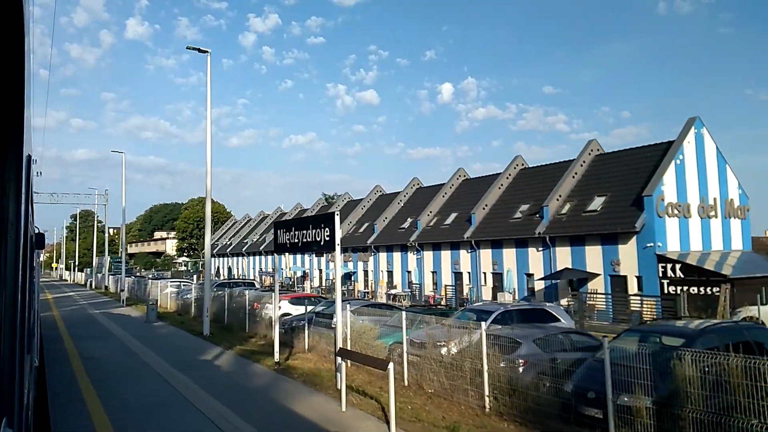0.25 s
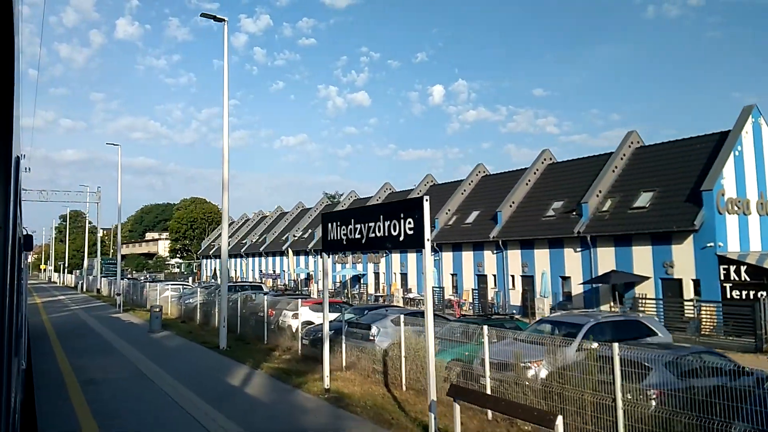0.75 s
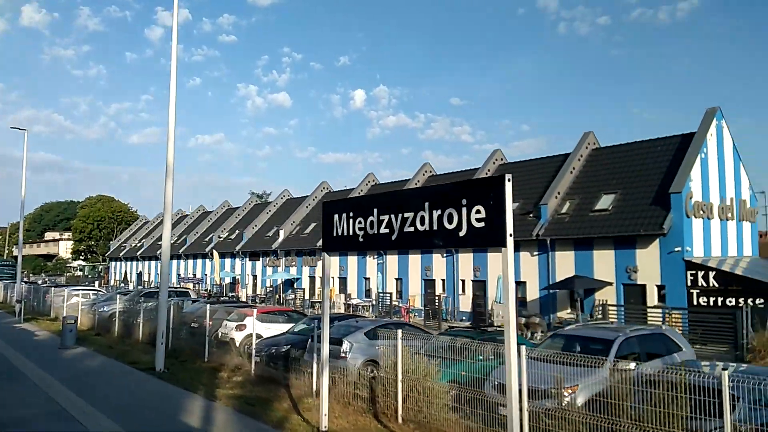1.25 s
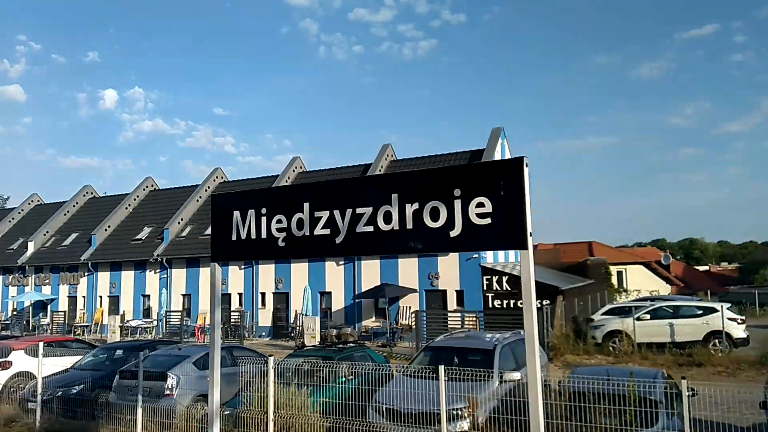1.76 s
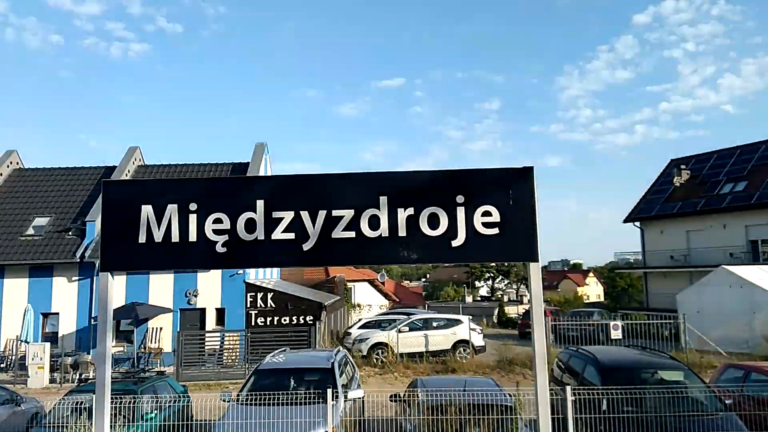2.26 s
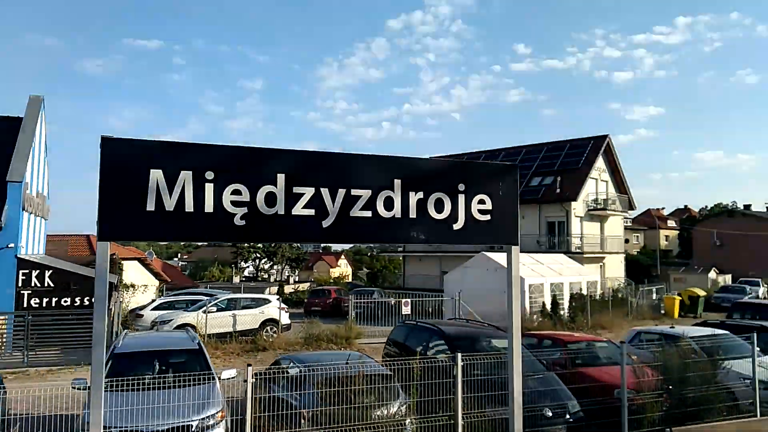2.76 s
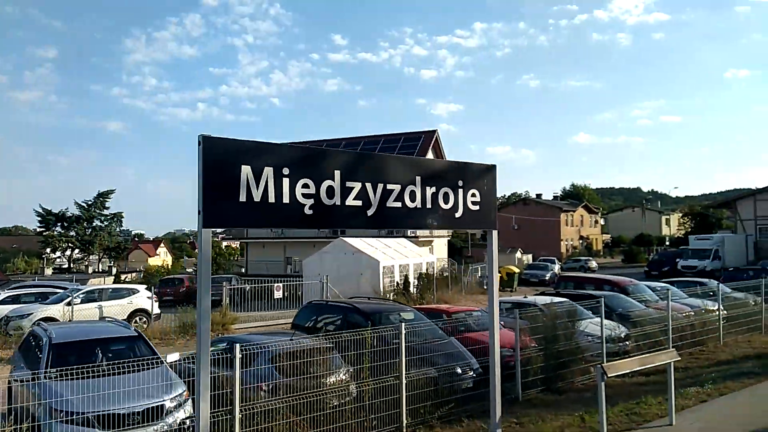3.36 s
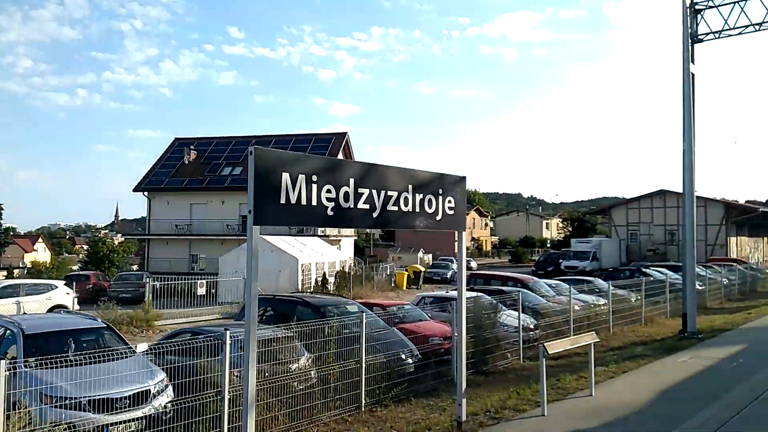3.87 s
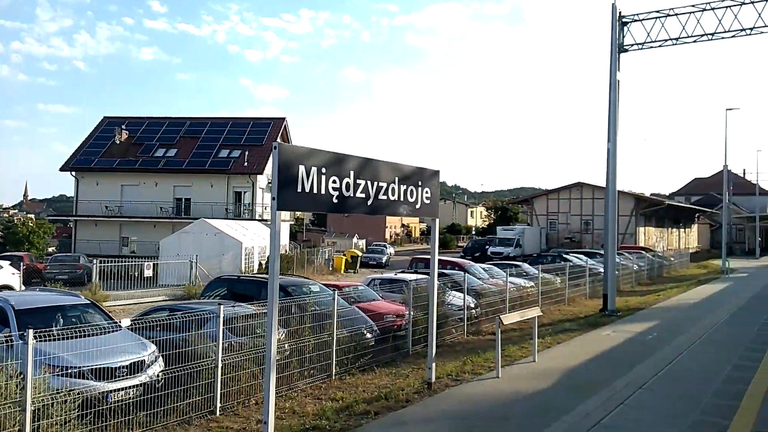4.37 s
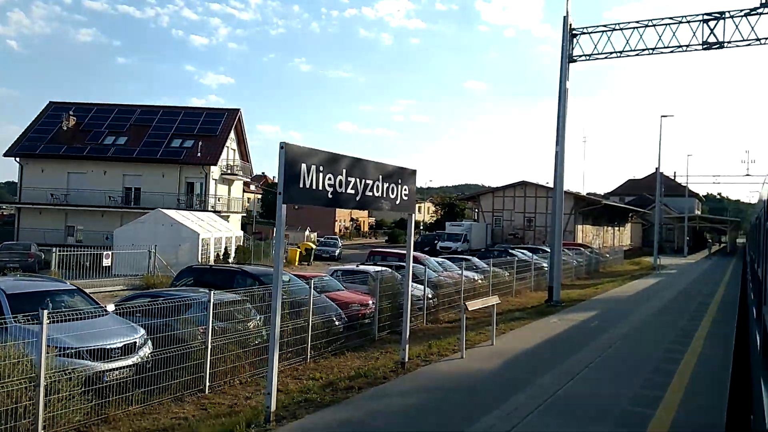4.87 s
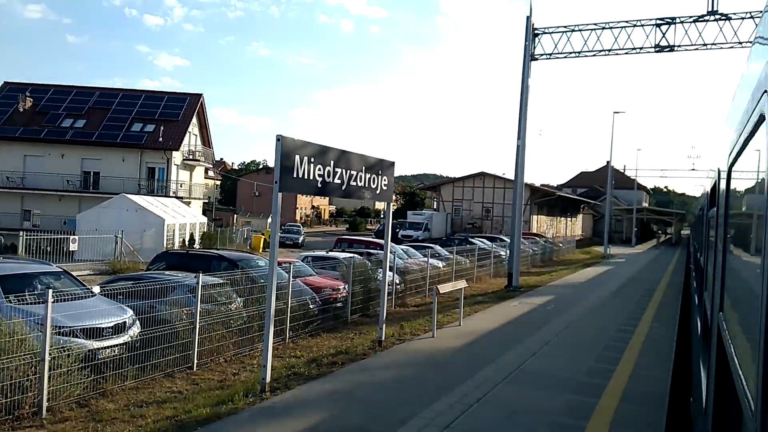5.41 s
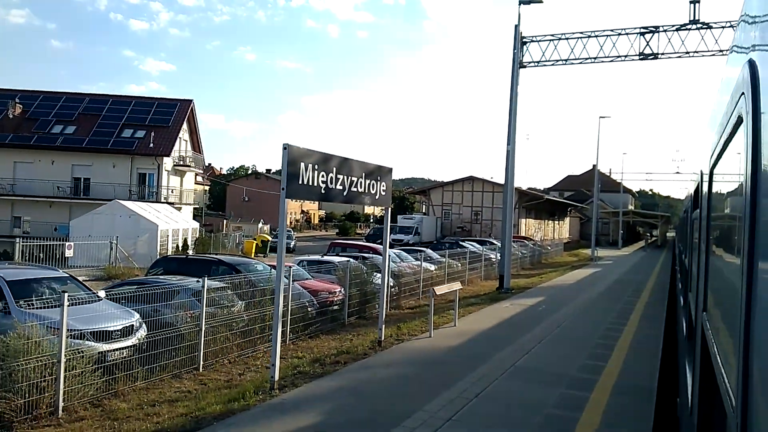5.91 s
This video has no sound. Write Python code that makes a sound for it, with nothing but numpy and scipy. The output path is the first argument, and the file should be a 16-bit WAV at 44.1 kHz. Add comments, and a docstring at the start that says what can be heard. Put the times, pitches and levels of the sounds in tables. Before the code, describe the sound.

Heard from an open window, a slowing train rumbles as its ragged brake squeal builds into a loud, piercing whistle.

```python
"""Train brakes squeal into a station, heard from an open carriage window.
Stick and slip sing one brake mode near 4.5 kHz: scattered and ragged at speed, then a loud, steadier
whistle with overtones and a buzz an octave below. The brakes also hiss, scrape, tick and rasp.
Underneath, air buffets the window, the bogies hum and knock, and rumble and rolling roar fade as the
train slows. A fast limiter holds the squeal down."""
import sys
import numpy as np
from scipy import signal
from scipy.fft import rfft, irfft
from scipy.io import wavfile
from scipy.ndimage import uniform_filter1d, minimum_filter1d

SR = 44100
rng = np.random.default_rng(int(sys.argv[2]) if len(sys.argv) > 2 else 0)


def inscribe(sig):
    """Save sig as 16-bit PCM at rate SR to the path in sys.argv[1].

    A 1-D sig is mono; a 2-D sig holds one channel per row.
    Samples are clipped to [-1, 1] before scaling.
    """
    pcm = np.round(np.clip(np.atleast_2d(sig).T, -1, 1) * 32767)
    wavfile.write(sys.argv[1], SR, pcm.astype(np.int16))


N = 271052
T = np.arange(N) / SR

# how hard the brakes bite: t/s, bite/0-1
BRAKE_BITE = [(0, 0), (1.6, 0.44), (2.0, 0.46), (2.38, 0.53), (2.6, 0.87), (3.2, 1), (6.15, 0.82)]


def gain_of(db):
    """Decibels to gain."""
    return 10 ** (np.asarray(db) / 20)


def unit_rms(x):
    """Scales a signal to unit rms."""
    return x / np.sqrt(np.mean(abs(x) ** 2) + 1e-20)


def curves(rows):
    """Automation lanes: one per column, in straight lines between the times."""
    times, *columns = np.transpose(rows)
    return np.array([np.interp(T, times, column) for column in columns])


def eq_curves(rows, hz):
    """EQ curves: one per column, joined on a log-frequency axis."""
    points_hz, *columns = np.transpose(rows)
    return np.array([np.interp(np.log(hz + 1), np.log(points_hz), column) for column in columns])


def plateaus(rows):
    """Brief rises or dips with rounded shoulders: one lane per column of heights."""
    return sum(np.array(heights)[:, None] / (1 + (2 * (T - centre) / length) ** 4)
               for centre, length, *heights in rows)


def wander(rate_hz):
    """Random modulation of unit rms, up to about the given rate."""
    hz = np.fft.rfftfreq(N, 1 / SR)
    return unit_rms(irfft(rfft(rng.standard_normal(N)) / (1 + (hz / rate_hz) ** 4), N))


def noise(eq, band_hz, left_lag_s=0.0002):
    """Coloured stereo noise with unit power in the band, reaching the left a little later."""
    # likeness of the two sides, narrow bass and wide treble: f/Hz, coherence/0-1
    likeness = [(60, 0.78), (130, 0.9), (300, 0.85), (620, 1), (1300, 0.21), (2500, 0.075), (6000, .02)]
    hz = np.fft.rfftfreq(N, 1 / SR)
    common, separate = rfft(rng.standard_normal((2, N)))
    coherence = eq_curves(likeness, hz)[0]
    left = common * np.exp(-2j * np.pi * hz * left_lag_s)
    right = coherence * common + np.sqrt(1 - coherence ** 2) * separate
    low_cut = hz / (hz + 10)
    spectrum = np.array([left, right]) * gain_of(eq_curves(eq, hz)) * low_cut
    in_band = (hz > band_hz[0]) & (hz < band_hz[1])
    return irfft(spectrum, N) / np.std(irfft(spectrum * in_band, N))


def bursts(hits, eq, band_hz, attack_s):
    """Noise hits with a quick attack and an exponential decay."""
    envelope = np.zeros(N)
    for start, db, decay_s in hits:
        age = np.maximum(T - start, 0)
        envelope += gain_of(db) * (1 - np.exp(-age / attack_s)) * np.exp(-age / decay_s)
    return envelope * noise(eq, band_hz)


def ringing(x, modes):
    """What a sound stirs up in a set of resonances."""
    return sum(gain_of(db) * signal.lfilter(*signal.iirpeak(hz, hz / width, SR), x)
               for hz, width, db in modes)


def echo_field(spread_hz, size=65536, oversample=64):
    """Many shifting echoes of one tone add to a random phasor; more spread turns it faster."""
    f = np.fft.fftfreq(size, 1 / oversample)
    white = rng.standard_normal((size, 2)) @ [1, 1j]
    field = unit_rms(np.fft.ifft(np.fft.fft(white) * np.exp(-abs(f) ** 1.19)))
    position = np.cumsum(spread_hz) * 2 * oversample / SR
    return np.interp(position, np.arange(size), field, period=size)


def wheel_swell(per_turn, peak_at_turn, grazing_db, biting_db):
    """Tremolo in dB: the slowing wheels, slightly out of round, press on the brakes in a cycle."""
    turns_per_s, slowing_turns_per_s2 = 1.59, 0.03
    turns = turns_per_s * T - slowing_turns_per_s2 * T ** 2 / 2
    depth_db = grazing_db + (biting_db - grazing_db) * curves(BRAKE_BITE)[0]
    return depth_db * np.cos(2 * np.pi * per_turn * (turns - peak_at_turn))


def window_air():
    """Air buffets the open window: a steady, deep bed."""
    # buffeting EQ: f/Hz, left/dB, right/dB
    air_eq = [(15, -4, -10), (40, 12, 2), (68, 10, -2), (125, -18, -24), (180, -7, -15),
              (240, -28, -40), (800, -35, -40)]
    return gain_of(-54) * noise(air_eq, band_hz=(35, 150))


def bogie_hum():
    """A low hum under the carriage sinks and fades, left of centre."""
    # hum glide: t/s, f/Hz, level/dB
    glide = [(0, 277, -42), (.2, 268, -38.5), (.4, 254.5, -42), (.55, 252.6, -34), (.75, 251, -41.5),
             (.95, 248, -60), (1.6, 230, -82)]
    hz, level_db = curves(glide)
    phase = 2 * np.pi * np.cumsum(hz + 4 * wander(rate_hz=6.4)) / SR
    return np.sqrt(2) * gain_of(level_db + [[0], [-7]]) * np.sin(phase)


def bogie_knocks():
    """The running gear gives a few soft knocks."""
    # knocks: t/s, level/dB, decay/s
    knocks = [(2.85, -34, 0.052), (4.38, -34, 0.045), (5.06, -32, 0.052)]
    # dull thud EQ: f/Hz, left/dB, right/dB
    knock_eq = [(30, -25, -28), (70, -11, -12), (120, 3, -19), (190, -6, -13), (450, -26, -28),
                (1200, -55, -55)]
    return bursts(knocks, knock_eq, band_hz=(35, 200), attack_s=0.0008)


def bogie_rumble():
    """The running gear rumbles, dying away as the train slows."""
    # rumble fade: t/s, level/dB
    fade = [(0, -38), (2.2, -37.5), (3.6, -39.5), (5.05, -41), (5.25, -45.5), (6.15, -47)]
    # rumble EQ: f/Hz, left/dB, right/dB
    rumble_eq = [(17.97, -30, -34), (35, -34, -25), (50.3, -4.5, -7.5), (69.4, 4, -2.5), (111, -0.5, -2.5),
                 (143, -4.5, -12.5), (223, -8, -14.5), (280, -5.5, -10), (440, -10.5, -19),
                 (576, -48, -24.5), (1500, -54, -59)]
    return noise(rumble_eq, band_hz=(35, 150)) * gain_of(curves(fade) + 1.15 * wander(rate_hz=40))


def rolling_roar():
    """Wheels roar on the rails and set the metal ringing, fading as the train slows."""
    # roar fade: t/s, level/dB
    fade = [(0, -29.5), (1.5, -31.5), (2.7, -37), (4.5, -44), (6.15, -50)]
    # roar EQ: f/Hz, left/dB, right/dB
    roar_eq = [(90, -36, -40), (163, -4, -7.5), (258, -6, -12), (387, -6, -11.5), (546, -6, -13.5),
               (750, -6, -13.5), (787, -3.5, -11.5), (965, -3.5, -13.5), (1330, -3, -14), (1510, -1, -17.5),
               (2070, -0.5, -20.5), (2490, -7, -24), (3320, -13.5, -22.5), (5840, -41, -52)]
    # wheel and bogie frame resonances: f/Hz, width/Hz, gain/dB
    modes = [(300, 24, -3.5), (826, 31, -11), (1083, 31, -10.5), (1916, 45, -20)]
    roar = noise(roar_eq, band_hz=(500, 1600)) * gain_of(curves(fade) + 0.5 * wander(rate_hz=10.4))
    return roar + ringing(roar, modes)


def hiss_level_db():
    """Level of the brake hiss: it swells twice a wheel turn, with a few brief dips."""
    # hiss ride: t/s, level/dB
    ride = [(0, -45), (1, -48.5), (1.9, -46.5), (2.36, -49), (2.52, -43), (3.3, -39.5), (4.6, -41),
            (5.5, -41), (6.15, -44.5)]
    # brief dips in the hiss and one lift; the last two duck under loud surges of the squeal:
    # centre/s, length/s, gain/dB
    dips = [(.7, 0.051, -1), (1.06, .08, 2), (2.04, 0.06, -3), (2.36, 0.1, -3.5), (2.75, 0.055, -2),
            (5.68, 0.12, -9.5), (6.13, 0.045, -5.5)]
    swell_db = wheel_swell(per_turn=2, peak_at_turn=0.43, grazing_db=1.6, biting_db=0.36)
    return curves(ride)[0] + swell_db + plateaus(dips)


def brake_hiss():
    """Friction hiss: thin while the brakes graze, broad and gritty once they bite."""
    # grazing EQ: f/Hz, left/dB, right/dB
    grazing_eq = [(800, -23, -5), (2500, 4, -7.5), (4100, -0.5, -4), (5200, -14, -23), (5870, -6, -2.5),
                  (6750, -7, -11.5), (7440, -7, 4), (8170, -25, -4.5), (8700, -10, 0.5), (10000, -19, -9),
                  (11100, -14, -10), (12400, -24, -14), (13800, -10, -24)]
    # biting EQ: f/Hz, left/dB, right/dB
    biting_eq = [(400.9, -33, -15.5), (850, -13.5, -11.5), (1400, -17.5, -15.5), (1988.9, 2, -13.5),
                 (2760, -2, -14), (3450, -6, -10), (4140, 2.5, 2), (5024, -4.5, -0.5), (5340, -37.5, -37),
                 (6340, -10.5, -14), (7570, -15.5, -9.5), (9100, -5.5, -3.5), (10140, -18, -14),
                 (12500, -13, -18.5), (14000, -20, -23)]
    treble_hz = (7000, 13000)
    bite = curves(BRAKE_BITE)
    grazing_flicker_db = 2 * wander(rate_hz=22)
    biting_flicker_db = 1.6 * wander(rate_hz=55)
    grazing = np.sqrt(1 - bite) * noise(grazing_eq, treble_hz) * gain_of(2.5 + grazing_flicker_db)
    biting = np.sqrt(bite) * noise(biting_eq, treble_hz) * gain_of(2 + biting_flicker_db)
    return (grazing + biting) * gain_of(hiss_level_db())


def brake_scrapes():
    """A brake catches in short, harsh scrapes."""
    # scrapes: t/s, level/dB, decay/s
    catches = [(.745, -45, .026), (.91, -41, 0.054), (1.375, -38, 0.05), (1.535, -40, 0.045),
               (1.838, -40, .03), (3.42, -32, .035), (4.085, -31, 0.03), (4.345, -34, 0.032),
               (4.89, -30, 0.038), (5.268, -30, .04), (5.8, -35, 0.064)]
    # harsh treble EQ: f/Hz, left/dB, right/dB
    scrape_eq = [(1200, -30, -24), (3000, -18, -19), (5250, -6, -4), (6500, -2, 0), (8060, -9, 3),
                 (10300, -13, -3), (14000, -4, -17)]
    return bursts(catches, scrape_eq, band_hz=(3000, 13000), attack_s=0.0053)


def brake_ticks():
    """Metal ticks sharply on metal in the first two seconds."""
    # ticks: t/s, level/dB, decay/s
    ticks = [(.078, -41, .005), (.7525, -34, 0.008), (1.073, -37, .005), (1.393, -47, 0.0047),
             (1.5528, -22.5, 0.0015), (1.5575, -36, .002), (1.856, -32, 0.004)]
    # bright click EQ: f/Hz, left/dB, right/dB
    tick_eq = [(1200, -25, -25), (3500, -5, -14), (5200, 7, -1), (6500, -5, -2), (7800, -4, 5),
               (10400, -10, -7), (14000, -12, -18)]
    return bursts(ticks, tick_eq, band_hz=(3000, 13000), attack_s=0.0002)


def brake_rasp():
    """Near the stop the brakes rasp in short, gritty surges that set the metal ringing."""
    # rasps: centre/s, length/s, level/dB
    rasps = [(4.6, .06, -60), (5.07, 0.11, -40.5), (5.19, 0.044, -41), (5.315, 0.062, -41),
             (5.41, .06, -45), (5.5, .04, -38), (5.634, 0.075, -45.5), (5.725, 0.046, -44),
             (5.83, 0.066, -47), (5.995, 0.056, -44)]
    # rasp EQ: f/Hz, left/dB, right/dB
    rasp_eq = [(900, -18, -28), (1500, -16, -18), (2080, 7.5, -10), (2700, -1.5, -11), (3600, -4.5, -13),
               (4300, -14, -12), (5600, -9, -7), (7000, -18, -28), (11000, -30, -40)]
    # metal resonances: f/Hz, width/Hz, gain/dB
    modes = [(3420, 32, 6), (3600, 41, 5)]
    grit = noise(rasp_eq, band_hz=(2600, 3900)) * gain_of(2.5 * wander(rate_hz=110))
    grit *= plateaus([(centre, length, gain_of(db)) for centre, length, db in rasps])
    return grit + ringing(grit, modes)


def brake_squeal():
    """Stick and slip sing one mode of the brake; it arrives directly and by many moving paths."""
    # squeal pitch, settling as the train slows: t/s, f/Hz
    pitch = [(0, 4484), (.5, 4481), (1.0, 4493), (2.2, 4483), (3.1, 4468), (3.5, 4458), (3.8, 4465),
             (4.25, 4455), (4.7, 4464), (5.0, 4454), (5.19, 4440), (5.33, 4454), (5.7, 4450), (5.84, 4459),
             (6.15, 4448)]
    # echoes, settling with it: t/s, spread/Hz, scattered share/0-1
    echoes = [(0, 46.6, 0.83), (2.7, 40.6, 0.98), (3.6, 29, 0.82), (4.2, 26.3, 0.79), (4.9, 24, 0.71),
              (5.6, 19.6, 0.48), (6.15, 17.2, 0.45)]
    waver_hz, right_lead_rad = 6, 0.65  # the squeal reaches the right side first
    spread_hz, echo_share = curves(echoes)
    phase = 2 * np.pi * np.cumsum(curves(pitch)[0] + waver_hz * wander(rate_hz=8.77)) / SR

    def partial(multiple, level_db, scattered, widen=1, swirl=0):
        """One partial with its own echoes on each side; swirl turns the right against the left."""
        shares = np.clip(scattered, 0, 1) * np.ones((2, N))
        left, right = (np.sqrt(1 - s) + np.sqrt(s) * echo_field(spread_hz * widen) for s in shares)
        right = (1 - swirl) * right * np.exp(1j * right_lead_rad) + swirl * left
        right *= np.exp(1j * np.pi * swirl)
        tone = (np.array([left, right]) * np.exp(1j * multiple * phase)).real
        return np.sqrt(2) * gain_of(level_db) * tone

    # main tone ride: t/s, left/dB, right/dB
    ride = [(0, -30, -37), (1.1, -24, -34.5), (1.8, -25.5, -26.5), (2.2, -21.5, -24.5), (2.8, -18, -25),
            (3.4, -14.5, -16), (4.6, -12.5, -12.5), (5.3, -17.5, -14), (6.15, -15, -15.5)]
    # the squeal locks into a loud, pure whistle: centre/s, length/s, left/dB, right/dB
    surges = [(1.02, 0.054, 4.5, 5), (1.24, 0.097, 3.5, 3), (1.66, 0.041, 2.5, 3), (2.19, 0.025, 6.5, 2.5),
              (2.33, 0.054, 2, 0.5), (2.51, 0.11, 2.5, 4.5), (2.93, 0.041, 2.5, 3), (3.005, 0.013, -1, 3),
              (3.94, 0.033, 2, 5), (4.34, 0.023, 0, 0), (4.77, 0.017, 5, 9), (4.935, 0.046, 8, 2),
              (5.15, 0.06, 10, 5), (5.245, 0.05, 13, 0), (5.39, 0.02, 4, 2), (5.468, .016, 1, 3),
              (5.53, 0.039, 8, 4), (5.67, 0.068, -7, 8), (5.77, 0.078, 6.5, 1.5), (5.93, 0.043, 4.5, 2.5),
              (6.11, 0.037, -1.5, 6)]
    # brief dropouts, mostly on one side: centre/s, length/s, left/dB, right/dB
    dropouts = [(.045, 0.017, -21, -10), (1.55, 0.058, -2, -7), (1.75, 0.04, -6, -1),
                (2.42, 0.031, -2.5, -2), (2.61, 0.012, 3, -2), (3.04, 0.047, 0.5, -6),
                (3.335, 0.015, -11, 3), (3.78, .015, -12, -6), (4.0, 0.047, -13, -7),
                (4.595, 0.036, -13, -7), (4.718, 0.015, -15, -17), (4.975, 0.023, -6, -27),
                (5.07, 0.059, -0.5, 3.5), (5.28, 0.022, 5, -16), (5.315, 0.029, -1, 3),
                (6.06, 0.018, -25, 8)]
    # shifting echoes put the two sides out of step: centre/s, length/s, depth/0-1
    swirls = [(2.42, .03, 1), (4.27, .02, .85), (4.907, .016, .82), (5.013, .024, .78), (5.213, .016, .78),
              (5.441, .03, .8), (5.561, .021, 1), (5.59, .02, .8), (5.63, .05, .5), (5.858, .022, .75),
              (6.014, .028, .8)]
    swell_db = wheel_swell(per_turn=3, peak_at_turn=0.29, grazing_db=1.4, biting_db=0.2)
    surge_db = plateaus(surges)
    main_db = curves(ride) + swell_db + surge_db
    stutter_db = -0.9 * (1 - curves(BRAKE_BITE)) * wander(rate_hz=37)
    main_share = echo_share * gain_of(-0.95 * surge_db)  # the stronger the surge, the purer the tone
    swirl = np.clip(plateaus(swirls)[0], 0, 1)
    squeal = partial(1, main_db + stutter_db + plateaus(dropouts), main_share, swirl=swirl)

    # a buzz an octave down sets in late, as strong and weak slips alternate: t/s, level/dB
    buzz_ride = [(2.4, -84), (3.4, -42.5), (4.6, -42), (5.1, -39), (6.15, -44)]
    # flare-ups of the buzz: centre/s, length/s, gain/dB
    chatters = [(3.87, 0.092, 6), (4.02, 0.14, 4), (4.73, .07, 5), (4.83, .04, 5), (5.012, 0.032, 12),
                (5.065, 0.042, 6), (5.16, 0.017, 10), (5.203, 0.026, 8), (5.34, 0.026, 2.5), (5.41, .06, 6),
                (5.495, 0.049, 10), (5.705, 0.07, 6.5), (5.86, 0.026, 8), (6.08, 0.07, 8.5)]
    # overtones ride on the hiss and grow as the train slows: t/s, level over hiss/dB
    overtone_ride = [(0, -4.5), (2.4, -21), (3.2, 0.5), (4.6, 6), (5.0, 7.5), (5.5, 4), (6.15, 4.5)]
    # the top overtone comes in late and follows the main tone: t/s, gain/dB
    top_ride = [(2.4, -28), (3.2, 0), (4.6, -3.5), (5.3, -2), (6.15, -3)]
    buzz_db = curves(buzz_ride) + plateaus(chatters) + 1.7 * wander(rate_hz=8.1)
    overtone_db = hiss_level_db() + curves(overtone_ride) + 2.04 * wander(rate_hz=26)
    top_db = main_db + curves(top_ride) + 1.5 * wander(rate_hz=15)

    # ragged partials of these three layers: f/pitch, left/dB, right/dB, spread/factor
    buzz = [(1 / 2, 4.1, -8, 1.3)]
    overtones = [(3 / 2, -20, -5, 1.8), (2, -14.5, 4, 1.72)]
    top = [(3, -29, -39, 1.6)]
    for layer_db, partials in ((buzz_db, buzz), (overtone_db, overtones), (top_db, top)):
        for multiple, left_db, right_db, widen in partials:
            squeal += partial(multiple, layer_db + [[left_db], [right_db]], scattered=0.96, widen=widen)

    # a higher mode chirps thinly while the brakes graze: centre/s, length/s, left/dB, right/dB
    chirps = [(.733, .012, -50, -39), (.764, .014, -50, -42), (1.396, .025, -50, -40),
              (1.58, .03, -50, -44)]
    chirp_gain = plateaus([(centre, length, *gain_of(sides_db)) for centre, length, *sides_db in chirps])
    return squeal + chirp_gain * partial(multiple=1.685, level_db=0, scattered=0.66)


def scene():
    """The brakes over the running gear, heard at the window."""
    return (brake_squeal() + bogie_rumble() + rolling_roar() + bogie_hum() + window_air()
            + brake_hiss() + brake_rasp() + brake_scrapes() + brake_ticks() + bogie_knocks())


def record(dry, ceiling_db=-11.0, release_db_per_s=700, high_cut_hz=14250):
    """A fast limiter on each side flattens the squeal and ducks the rest with it; then a high cut."""
    peak = -minimum_filter1d(-abs(dry), size=60, axis=1)
    over_db = np.maximum(20 * np.log10(peak + 1e-9) - ceiling_db, 0)
    release_db = T * release_db_per_s
    reduction_db = np.maximum.accumulate(over_db + release_db, axis=1) - release_db
    limited = dry / gain_of(uniform_filter1d(reduction_db, size=90, axis=1))
    low_pass = signal.firwin(511, high_cut_hz, window=("kaiser", 9), fs=SR)
    return signal.oaconvolve(limited, low_pass[None], "same", axes=1)


dry = scene()
out = record(dry)
inscribe(out)
```